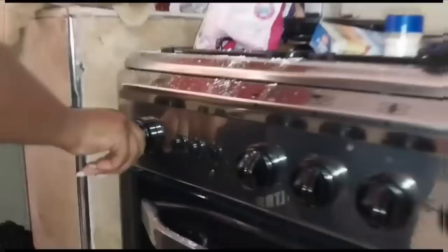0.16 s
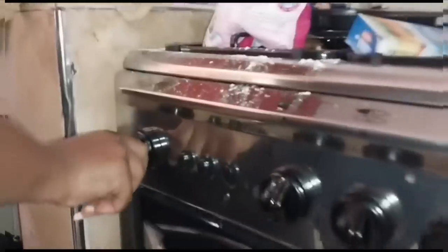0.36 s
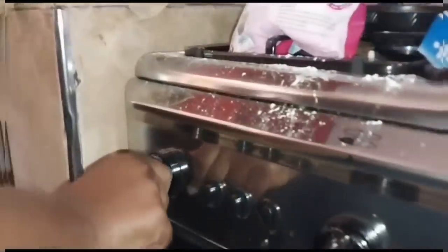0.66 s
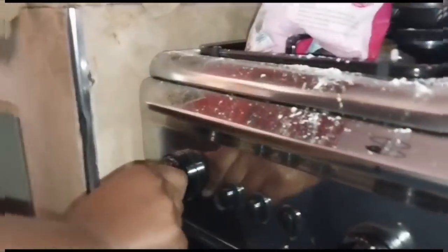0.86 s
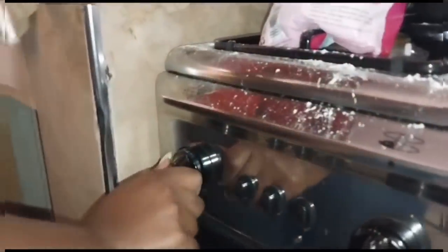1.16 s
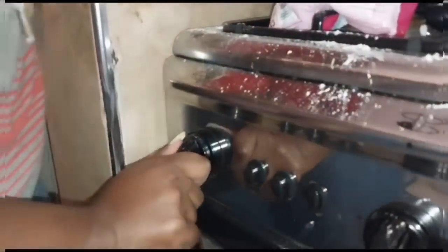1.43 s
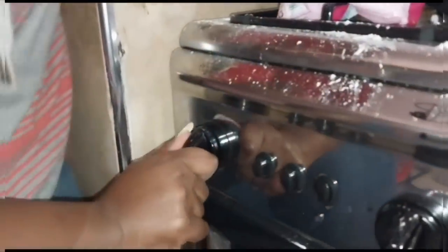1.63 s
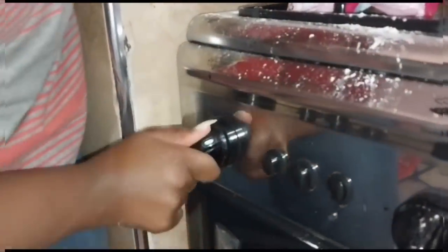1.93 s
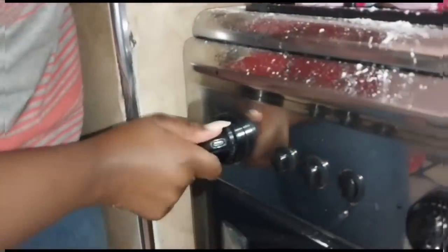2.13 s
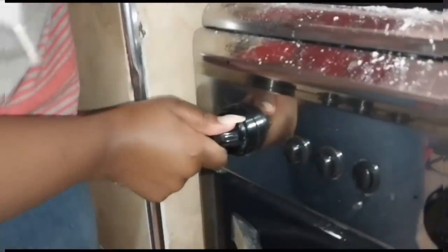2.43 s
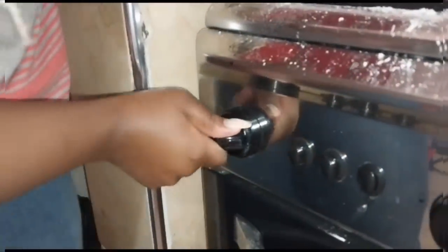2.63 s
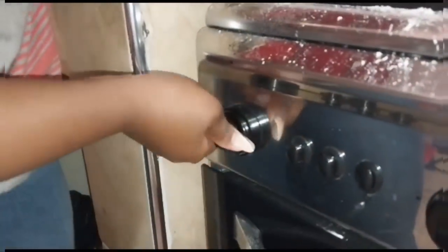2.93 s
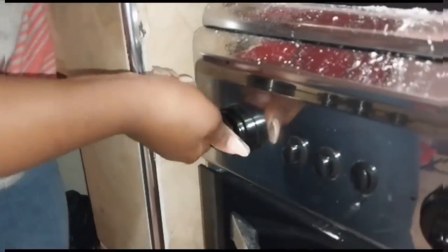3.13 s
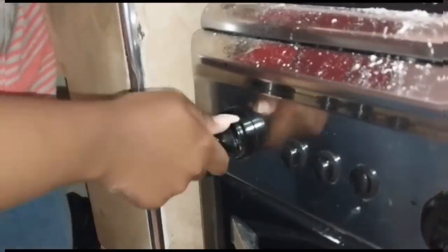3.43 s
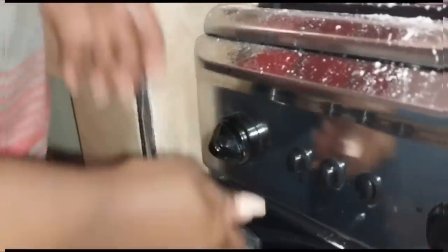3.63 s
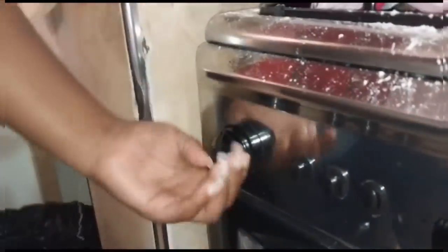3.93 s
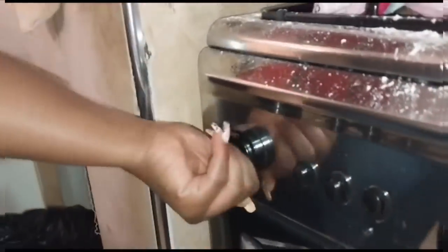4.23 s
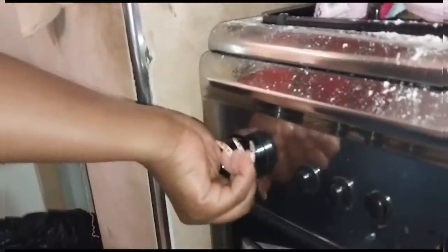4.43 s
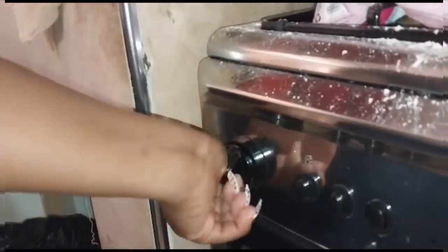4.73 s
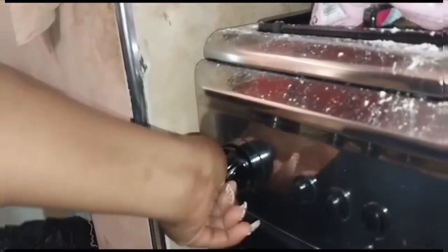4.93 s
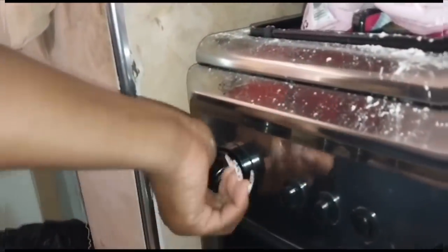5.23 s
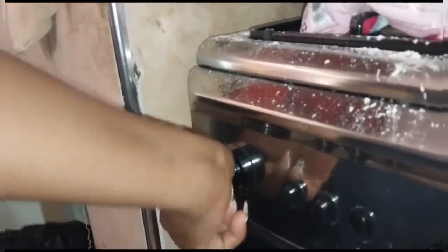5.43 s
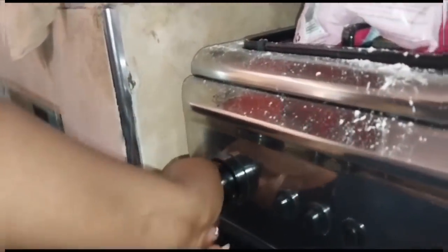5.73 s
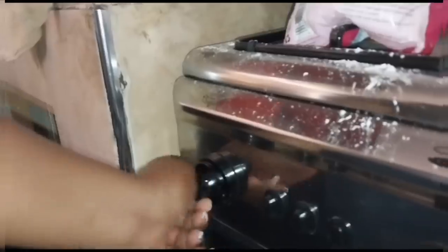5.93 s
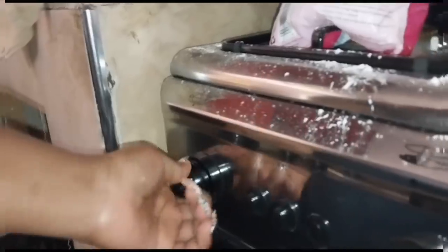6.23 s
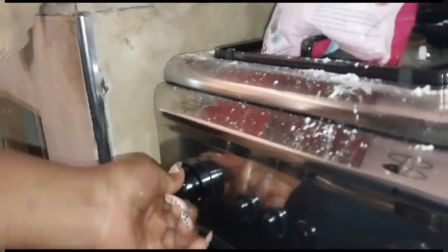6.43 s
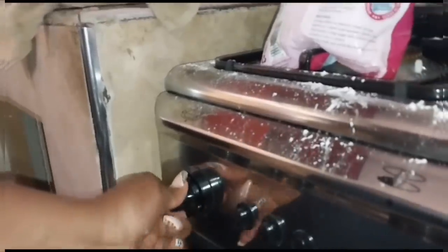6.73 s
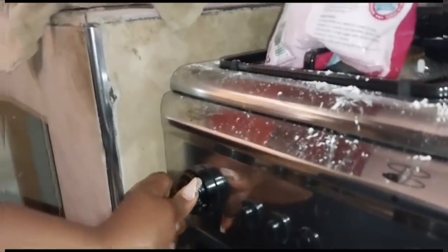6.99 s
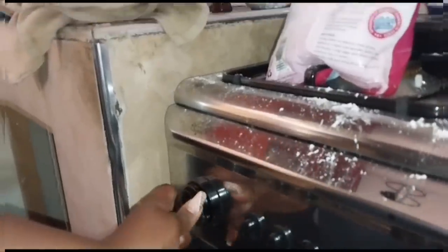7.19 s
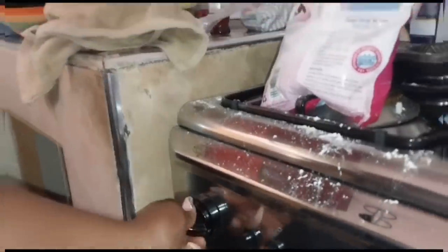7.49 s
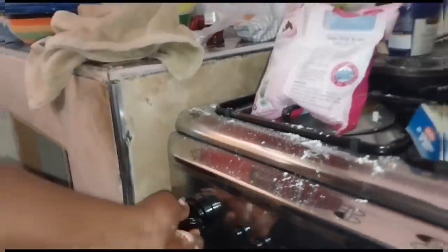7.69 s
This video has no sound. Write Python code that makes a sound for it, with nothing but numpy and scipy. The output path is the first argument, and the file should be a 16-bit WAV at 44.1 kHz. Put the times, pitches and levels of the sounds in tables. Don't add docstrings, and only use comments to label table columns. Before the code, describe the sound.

Close phone sound in a small kitchen with short, rattly reflections. At 0.13 s a crisp snap and a soft hollow thud, then gritty slipper and skin scuffs near 0.5 and 1.0 s. A faint spring whirr swells around 1.2 s among a few dry ticks at 1.1 to 1.6. At 1.77 to 1.78 s comes the loudest click pair, with a small, quickly choked metallic bell ting. Dense irregular ratchet clicks follow until about 3.6 s: thin bright ticks, snaps, plastic clacks, light steel-panel knocks. Sparser clicks and muffled oven thuds at 3.4 to 4.2, a light scuff at 4.4. Busy clusters run 4.6 to 5.0 and 5.4 to 5.75, a pause with few ticks, a bright snap at 6.46, then rapid uneven clicking from 6.7 to 7.8 s. Low oven boom and faint hush continue underneath.

```python
import sys
import numpy as np
from scipy import signal
from scipy.io import wavfile
from scipy.ndimage import uniform_filter1d

SR = 44100
rng = np.random.default_rng(int(sys.argv[2]) if len(sys.argv) > 2 else 0)


def wrap_up_sound(samples):
    columns = np.atleast_2d(samples).T
    tamed = np.clip(columns, -1, 1)
    steps = np.round(tamed * 32767).astype(np.int16)
    wavfile.write(sys.argv[1], SR, steps)


def to_linear_factor(level_db):
    exponent = np.asarray(level_db, float) / 20
    return 10 ** exponent


N = 346299

# (time [s], peak [dB], pawl ring [Hz], panel share [dB])
DULL_TICKS = [(0.3853, -35, 5160, -33), (1.1411, -18.5, 5240, -25.5), (1.363, -17.5, 5326, -31.5),
              (1.6146, -16.5, 5177, -24.5), (1.7705, -5.5, 5580, -21), (1.952, -16.5, 4943, -9.5),
              (3.325, -43, 5460, -19), (3.3418, -22.5, 5200, -16), (3.8484, -25.5, 5240, -29.5),
              (5.1915, -23.5, 5120, -14), (6.1605, -43, 5450, -45.5), (6.709, -42.5, 5030, -30.5),
              (6.7337, -21, 5200, -33.5), (6.9747, -18.5, 5400, -41.5), (7.3264, -22.5, 5440, -16.5),
              (7.5039, -23, 5330, -41.5), (7.767, -20, 5390, -31.5)]
BRIGHT_TICKS = [(2.0704, -19.5, 5515, -16.5), (2.3124, -22, 7330, -20.5), (2.58, -20.5, 6240, -44),
                (2.9464, -19.5, 4950, -11.5), (3.5907, -26.5, 5060, -48), (4.7995, -17, 4450, -8),
                (4.9085, -15, 5350, -14.5), (5.4616, -14, 5860, -16), (5.7108, -21, 5280, -11),
                (5.9502, -31, 4900, -22.5), (6.2063, -30, 5620, -29.5), (7.2482, -24.5, 5760, -22.5),
                (7.4854, -42.5, 5530, -52), (5.418, -52.5, 5300, -43), (7.126, -37, 5330, -40)]
DULL_SNAPS = [(0.8435, -31.5, 7500, -13), (0.8922, -28, 4780, -12), (1.7999, -16, 4500, -5.5),
              (4.3187, -31.5, 4800, -13), (4.402, -21.5, 5040, -12), (4.6615, -19.5, 5330, -7),
              (5.0239, -28.5, 4810, -17), (5.5655, -22, 4420, -12), (6.762, -24.5, 4900, -13)]
BRIGHT_SNAPS = [(0.1271, -15.5, 5044, -11), (1.9063, -22.5, 4800, -22.5), (2.0264, -27, 7350, -4.5),
                (2.2259, -22, 5270, -8), (2.992, -19.5, 5210, -20), (3.0832, -21.5, 5500, -21.5),
                (3.3591, -29.5, 4900, -12.5), (4.1219, -28, 4970, -11), (4.731, -25.5, 5230, -4.5),
                (5.216, -29, 5040, -9), (5.456, -23.5, 4830, -36), (5.5918, -27, 4640, -20),
                (5.969, -32, 4880, -8), (6.4617, -17, 5200, -14), (6.8722, -33, 4270, -19),
                (6.9005, -22, 5410, -14), (1.895, -32.5, 5200, -30.5), (7.0618, -20.5, 5807, -13),
                (7.3559, -27.5, 4870, -16.5), (7.7162, -31.5, 6260, -23), (4.028, -45.5, 4710, -32.5),
                (4.272, -44.5, 5200, -30), (4.795, -22, 4795, -29.5), (5.754, -34, 5200, -22),
                (6.979, -35, 5370, -18.5), (7.075, -47, 5300, -20.5), (7.103, -33.5, 5200, -24)]
DULL_CLACKS = [(0.4776, -33.5, 4774, 4.5), (1.7799, -11, 7060, -11), (2.14, -29.5, 5030, -1),
               (2.7063, -29, 4470, -4), (2.9019, -28.5, 4680, -3.5), (2.958, -29.5, 7360, -22.5),
               (3.4033, -31, 4830, -2.5), (3.4991, -46, 3570, 0.5), (3.537, -49.5, 3400, -0.5),
               (3.9842, -52, 4960, 15.5), (4.1966, -30.5, 5200, 2.5), (4.6343, -27.5, 5200, -0.5),
               (4.678, -25, 4310, -6), (4.817, -23, 5000, -23.5), (5.4462, -40, 4940, -5),
               (5.6013, -28.5, 4740, -10), (5.7203, -25, 5950, -15.5), (6.9585, -23.5, 5200, -7.5),
               (7.5769, -27.5, 4890, -13.5), (4.131, -51.5, 4500, -11), (5.427, -52.5, 4470, -3.5),
               (6.848, -29, 4780, -23.5)]
BRIGHT_CLACKS = [(1.8594, -24, 4460, -8), (2.348, -30.5, 6300, -8), (2.7922, -24, 5270, -5),
                 (2.815, -26.5, 4960, -21.5), (2.8534, -25.5, 4840, -7.5), (4.5697, -28, 5320, -2.5),
                 (4.9722, -27.5, 5110, -1.5), (5.6444, -25.5, 5050, -5), (6.8274, -31.5, 4260, -19.5),
                 (6.8404, -27.5, 6200, -7), (6.9318, -27, 4600, -8.5), (7.1693, -23.5, 4890, -11.5),
                 (7.0455, -34.5, 4700, -37.5)]
SLIP_S = [.166, .267, .759, .873, 2.503, 3.363, 3.527, 3.553, 3.828, 4.55, 5.184, 5.934, 6.401]
# (peak [dB], pawl ring [Hz], panel share [dB])
SLIP = [(-29.5, 5200, -40), (-39.5, 4970, -40.5), (-56.5, 4730, 8.5), (-38.5, 4700, -30.5), (-57, 4800, 3),
        (-36.5, 3600, -27), (-47.5, 2800, -24.5), (-42, 5000, -31), (-56.5, 5093, -53.5), (-47, 5000, 5),
        (-33.5, 5100, -20.5), (-41.5, 5450, -39), (-62.5, 5100, 1.5)]
PANEL_HZ = [780, 860, 990, 1070, 1250, 470, 620, 340]
# (level [dB], t60 [s])
PANEL = [(-11, 0.064), (-7, 0.0749), (1.5, 0.0566), (-5, 0.041), (-8.5, 0.04), (-10.5, 0.0504),
         (-11.5, 0.0428), (-8.5, 0.0675)]


def ratchet():
    slips = [(s, *row) for s, row in zip(SLIP_S, SLIP)]
    # (clicks, treble share dB, knob share dB, knob dB lost per dB of pawl)
    kinds = [(DULL_TICKS, -17.5, -44.5, 0.009), (BRIGHT_TICKS, -2.2, -31.5, 0.01),
             (DULL_SNAPS, -13, -6.5, 0.01), (BRIGHT_SNAPS, -5, -4.5, 0.0104),
             (DULL_CLACKS, -23.5, 0.1, 0.27), (BRIGHT_CLACKS, -0.64, -0.084, 0.23),
             (slips, -18, -27.5, 0.01)]
    usual_db = -25
    detune = 0.02513
    near, far, knock = np.zeros((3, N))
    t = np.arange(SR // 5) / SR
    short = t[:1024]
    impulse = 1. * (short == 0)
    for rows, treble_db, base_knob_db, slope in kinds:
        for s, db, hz, panel_db in rows:
            knob_db = base_knob_db - slope * (db - usual_db)
            hiss, spread = rng.standard_normal(1024), rng.random(3)
            length_s = 0.000466 + 0.00063 * spread[0] ** 2
            chatter = hiss * short / length_s * np.exp(-short / length_s)
            ring_hz = hz, 5500 + 1800 * spread[1]
            high_hz = 9500 + 4500 * spread[2]
            shares_db = db + 2.0, db + treble_db - 5.5, db + knob_db - 1.0
            rattle_db = 0.1677 * np.clip(knob_db + 22.5, -20, 10)
            add(near, s, to_linear_factor(-1.0457) * clack(chatter, ring_hz, high_hz, shares_db, blur=0.7))
            add(far, s, to_linear_factor(rattle_db) * clack(impulse, ring_hz, high_hz, shares_db, blur=4.6))
            modes_hz = PANEL_HZ * (1 + detune * rng.standard_normal(len(PANEL)))
            swing = rings(modes_hz, PANEL, t, uneven_db=2.0)
            swing = swing * (1 - np.exp(-t / 0.0017))
            add(knock, s, to_linear_factor(db + panel_db - 2.5) * swing / abs(swing).max())
    small = signal.butter(2, 1300, "high", fs=SR, output="sos")
    near = signal.sosfilt(small, near) + knock
    far = signal.sosfilt(small, far) + to_linear_factor(-5.5) * knock
    return near, far


def clack(drive, ring_hz, high_hz, shares_db, blur):
    pawl_hz, body_hz = ring_hz
    pawl = 1.058 * resonate(resonate(drive, pawl_hz, 650 * blur), pawl_hz, 1400)
    pawl = pawl + 0.188 * resonate(resonate(drive, body_hz, 4600), body_hz, 4600)
    pawl = pawl + 0.537 * resonate(drive, 6300 + 0.1347 * (high_hz - 6000), 450 * blur)
    treble = resonate(drive, high_hz, 1500 * blur)
    treble = treble + resonate(resonate(drive, 12510, 6000), 10100, 8000)
    knob = resonate(drive, 2200 + 0.1 * body_hz, 500 * blur) + resonate(drive, 2000, 1300)
    return sum(to_linear_factor(db) * part / abs(part).max() for part, db in zip((pawl, treble, knob), shares_db))


# (time [s], peak [dB], ring [Hz])
WHEELS = [(0.1276, -25.5, 9700), (1.1406, -20, 11850), (1.3623, -29, 8930), (1.6144, -18, 11900),
          (1.77, -28, 11800), (1.782, -21, 11700), (1.905, -19, 12600), (1.952, -21, 12400),
          (2.026, -22.5, 12150), (2.07, -20, 11300), (2.1375, -25, 12400), (2.2264, -26, 9230),
          (2.3116, -19.5, 12200), (2.3482, -19.5, 11690), (2.5798, -17.5, 13600), (2.707, -30.5, 12100),
          (2.7926, -40, 12300), (2.815, -17.5, 9500), (2.8529, -24, 12150), (2.9474, -31, 12600),
          (2.9932, -18.5, 12900), (3.0834, -18.5, 11780), (3.3404, -31, 12400), (3.5925, -28.5, 11800),
          (3.849, -33, 11730), (4.121, -28.5, 11500), (4.1964, -36, 12500), (4.318, -35, 10100),
          (4.4017, -29, 12100), (4.5705, -26.5, 11840), (4.635, -32, 11900), (4.6598, -22, 13500),
          (4.7315, -25.5, 12000), (4.7975, -20, 12500), (4.9075, -22, 13900), (4.9724, -26, 12040),
          (5.457, -16, 9700), (5.462, -11, 12420), (5.5653, -41.5, 11900), (5.645, -26.5, 12150),
          (5.712, -19.5, 9840), (6.2066, -26.5, 9550), (6.4626, -12.5, 10000), (6.7332, -21.5, 9700),
          (6.8283, -22, 11340), (6.9012, -22.5, 13300), (6.9311, -26, 14900), (6.976, -21.5, 11370),
          (7.045, -25, 12850), (7.1694, -27, 10100), (7.2483, -21.5, 9170), (7.3258, -26.5, 9240),
          (7.3557, -28, 10000), (7.4865, -41.5, 9180), (7.5044, -30, 12450), (7.5762, -32, 11310),
          (7.7165, -22.5, 14700), (7.7664, -23, 12100),
          (6.8408, -19.5, 11900), (6.9585, -25.5, 10500), (7.0622, -25, 9300)]
# (time [s], peak [dB], ring [Hz])
KNOB = [(0.1266, -20.5, 3696), (0.9933, -33.5, 3380), (1.008, -26.5, 3210), (1.0114, -19, 3240),
        (1.7704, -35, 3840), (1.7812, -13.5, 2773), (1.888, -26.5, 2600), (2.14, -26, 2998),
        (2.2256, -34.5, 3522), (2.3464, -32, 2215), (2.7067, -31.5, 2770), (2.7932, -36, 2330),
        (2.8526, -29.5, 2910), (2.901, -30.5, 3150), (2.9473, -26, 3000), (2.9924, -32, 2980),
        (3.083, -55, 3040), (3.339, -40.5, 3600), (3.4014, -37, 3040), (3.4994, -34, 3510),
        (4.132, -40, 3300), (4.1958, -35, 3130), (4.3172, -38, 3440), (4.4026, -30, 3020),
        (4.57, -33.5, 3040), (4.6342, -30.5, 3830), (4.674, -34.5, 3750), (4.7974, -21.5, 3330),
        (4.9059, -27, 3230), (4.9719, -34.5, 3115), (5.1896, -43, 3900), (5.2163, -36.5, 3000),
        (5.457, -32, 3730), (5.4604, -27, 3010), (5.565, -49, 3800), (5.6439, -28.5, 3590),
        (5.7193, -47.5, 2980), (5.72, -29.5, 3160), (6.4612, -32.5, 3070), (6.7327, -51.5, 3734),
        (6.761, -33.5, 3190), (6.8274, -27.5, 3060), (6.8473, -23, 2990), (6.9016, -34.5, 3200),
        (6.9334, -28, 3140), (6.9568, -29.5, 3100), (7.0469, -28.5, 2990), (7.1702, -30, 2890),
        (7.3257, -43.5, 3810), (7.3579, -37.5, 2880), (7.5764, -32.5, 3090), (7.7154, -46, 3080)]


def parts():
    lead_s = 0.0005
    near, far = np.zeros((2, N))
    t = np.arange(1024) / SR
    impulse = 1. * (t == 0)
    # (clicks, ring width Hz, near dB, room dB)
    kinds = [(WHEELS, 1800, -5, -7), (KNOB, 568, -0.89, -3.2)]
    for rows, width_hz, near_db, far_db in kinds:
        for s, db, hz in rows:
            chatter = rng.standard_normal(1024) * t * np.exp(-t / 0.00072)
            for mix, drive, share_db in ((near, chatter, near_db), (far, impulse, far_db)):
                ring = resonate(resonate(drive, hz, width_hz), hz, 3.2 * width_hz)
                add(mix, s - lead_s, to_linear_factor(db + share_db) * ring / abs(ring).max())
    return np.array([near, far])


# (time [s], level [dB])
STRIKE = (1.783, -22)
BELL_HZ = [1247, 1275, 2589, 2583, 2651, 4293, 6352, 8807, 11693, 14996]
# (level [dB], t60 [s])
BELL = [(-4, 0.16), (-4, 0.16), (-1, 0.655), (-21.5, 0.3), (-7, 0.3), (-11, 1.05), (-17, 0.3), (-20, 0.28),
        (-6.5, 0.3), (-17, 0.2)]


def bell():
    choke_s, choke_width_s, choke_depth, choked_db_per_s = 0.096, 0.005, 0.85, -45
    out, t = np.zeros(N), np.arange(SR) / SR
    choke = 1 - choke_depth * np.exp(-((t - choke_s) / choke_width_s) ** 2)
    choke = choke * to_linear_factor(choked_db_per_s * np.clip(t - choke_s, 0, 0.15))
    swell = 1 - np.exp(-t / 0.0075)
    s, db = STRIKE
    add(out, s, to_linear_factor(db) * rings(BELL_HZ, BELL, t) * swell * choke)
    return out


# (level [dB], swell [s], fade [s])
DRAG = (-45.5, 0.065, 0.367)
# (frequency [Hz], width [Hz], level [dB])
DRAG_RINGS = [(616, 110, -17.5), (4540, 560, -10.5), (5050, 390, -1), (7500, 800, -0.5)]


def drag():
    peak_s = 1.17
    hiss = rng.standard_normal(N)
    ring = 0
    for hz, width_hz, db in DRAG_RINGS:
        ring = ring + to_linear_factor(db) * evened(resonate(resonate(hiss, hz, width_hz), hz, 2 * width_hz))
    return evened(ring) * spread_out(strokes(peak_s, *DRAG, 1.76, 1.1)[:, 0])


# (time [s], level [dB], frequency [Hz], t60 [s], pitch sag [share])
THUDS = [(0.132, -34, 91.27, 1, 0.0724), (.14, -30, 209.9, 0.455, 0.0533),
         (3.01, -42, 152.1, 0.746, 0.0182), (3.398, -33, 211.6, 0.388, 0.089),
         (3.402, -44.5, 506.7, 0.434, 0.116), (3.98, -33.5, 193.6, 0.92, 0.022),
         (3.98, -38, 103.9, 0.55, 0.049), (4.179, -30.5, 111, 0.283, 0.096),
         (4.195, -34.5, 241, 0.33, 0.0924), (4.197, -35.5, 560, 0.388, .15),
         (1.78, -35.5, 187.5, 0.836, 0.057), (1.789, -38, 100.6, 0.62, 0.06)]


def thuds():
    rise_s, wobble_db = 0.0117, 3
    out, t = np.zeros(N), np.arange(SR // 2) / SR
    for s, db, hz, t60, sag in THUDS:
        turns = np.cumsum(hz * (1 - sag * (1 - np.exp(-t / 0.08)))) / SR
        wobble = uniform_filter1d(rng.standard_normal(len(t)), size=500)
        wobble = evened(uniform_filter1d(wobble, size=500))
        level = to_linear_factor(db - 60 * t / t60 + wobble_db * wobble) * (1 - np.exp(-t / rise_s))
        add(out, s, level * np.sin(2 * np.pi * turns))
    return out


# (time [s], boom [dB], fade to -20 dB [s], floor share [dB], door share [dB])
JOLTS = [(0.157, -31, 0.268, -5, -3.5), (0.501, -42.5, 0.09, -15.5, -2.5), (1.794, -36, 0.46, -4, -6.5),
         (3.417, -40.5, 0.128, -15, 0.5), (4.003, -46, 1.4, -1, -8), (4.203, -40, 0.3929, -11, 0.5),
         (6.2, -51, 0.15, -23, -24), (6.42, -46.5, 0.41, -12, -11)]
# (peak time [s], boom [dB], swell from -20 dB [s], fade to -20 dB [s], door share [dB])
LEANS = [(.05, -65, 14, -1.14, 4), (.85, -51.5, -0.62, 0.12, -4.5), (1.4, -63.5, -1.66, 6.25, -15),
         (1.25, -68.5, 1.24, 1.43, 7.5), (2.2, -45.5, 0.35, .5, -20.5), (2.56, -57, 0.5, -1.5, -5.5),
         (3.75, -72, 2.8, -1.5, -16), (2.85, -41.5, 0.0252, 0.3548, -4), (4.68, -41, -0.0559, 0.6, -1.5),
         (4.98, -38.5, 0.1836, 0.0949, -16), (5.24, -48.5, -0.02, 0.01, -5), (5.721, -43, 0.38, 0.14, -7),
         (6.001, -52, 0.18, 0.1763, -5), (6.82, -50.5, 0.12, 0.61, -20), (7.15, -48, 0.3941, -0.06, -17.5),
         (7.4, -57.5, 0.96, 0.16, 1.5), (7.63, -54.5, 0.12, 0.5, 1.5)]
# (frequency [Hz], width [Hz], level [dB])
OVEN = [(155.7, 8.98, -4), (195.58, 18.58, 2.5), (238.6, 22.95, 0), (274.7, 59, -3)]
# (frequency [Hz], width [Hz], level [dB])
FLOOR = [(60, 80, -2), (97.8, 40, -6)]
# (frequency [Hz], width [Hz], level [dB])
DOOR = [(424.4, 22, -2), (491.8, 71.5, 0.76), (576.2, 150, -2)]


def oven():
    s, db, fade_s, floor_db, door_db = np.transpose(JOLTS)
    jolts = strokes(s, db, 0.0319, fade_s, 2.5, 1.205)
    *lean, lean_door_db = np.transpose(LEANS)
    leans = strokes(*lean, 1.242, 1.242)
    flat = 0 * lean_door_db
    rest_db = -67
    push = rng.standard_normal((2, N))
    push[0] = 0.517 * push[1] + 0.3 * push[0]
    # (modes, jolt share dB, lean share dB, rest share dB)
    walls = ((OVEN, 0 * s, flat, 0),
             (FLOOR, floor_db, flat - 14.5, 2.5),
             (DOOR, door_db - 5.0, lean_door_db - 6.5, -22.0))
    out = 0
    for modes, jolt_db, lean_db, rest_share_db in walls:
        ring = 0
        for hz, width_hz, mode_db in modes:
            mode = resonate(resonate(push, hz, 1.595 * width_hz), hz, 1.577 * width_hz)
            ring = ring + to_linear_factor(mode_db) * evened(mode)
        power = jolts @ to_linear_factor(2 * jolt_db) + leans @ to_linear_factor(2 * lean_db) + to_linear_factor(2 * (rest_db + rest_share_db))
        out = out + evened(ring) * spread_out(power)
    return out * to_linear_factor([[-0.8], [0.8]])


# (peak time [s], level [dB], swell from -20 dB [s], fade to -20 dB [s], brightness [dB/octave])
SCUFFS = [(.045, -49, 0.77, 0.1, -5), (.33, -53.5, 0.08, 0.5, -1), (0.198, -36, 0.0746, 0.03, -9.5),
          (.462, -59, 0.08, 0.0948, 2), (0.492, -28.5, 0.0484, 0.0115, -9),
          (0.556, -28, 0.1174, 0.0363, -3.5), (0.8, -35.5, -0.08, 0.0745, -10),
          (.86, -41.5, 0.177, 0.05, -3.5), (1.007, -25.5, -0.0016, 0.0383, -4),
          (1.053, -24.5, 0.0675, 0.0812, -4), (1.2, -44, 0.1441, 0.41, -3.5),
          (1.569, -45, 0.16, 0.2345, -3.5), (2.517, -46.5, -0.0252, 0.3624, -4.5),
          (2.608, -42.5, 0.0837, 0.1375, -5), (3.52, -55, 0.25, 0.7, -8),
          (3.683, -42, 0.1364, 0.1261, -5.5), (3.139, -52.5, -0.04, -0.0137, -8),
          (4.426, -36.5, 0.14, 0.1156, -4), (5.202, -59.5, 2.19, 0.23, -7.5),
          (0.991, -43, -0.09, 0.0421, -6), (1.51, -49, -0.11, -0.2, -11)]
# (frequency [Hz], density [dB/Hz])
RUB = [(300, -32.5), (900, -17), (1600, -5.5), (3000, 2), (4400, 3), (5200, 5.5), (8000, 6.5), (16000, -7)]


def scuffs():
    skin_hz, skin_width_hz, skin_db_per_tilt = 2870, 560, -0.1569
    *shape, tilts_db = np.transpose(SCUFFS)
    power = strokes(*shape, 1.47, 1.61)
    total = power.sum(1)
    s, tilt_db = np.arange(len(power)) / 1000, power @ tilts_db / total
    hz = np.fft.rfftfreq(512, 1 / SR)
    unit_db = -10 * np.log10(np.sum(to_linear_factor(2 * read(RUB, hz))))

    def level_db(f, t):
        octaves = np.log2(np.clip(f, 2300, 9000) / 4000)
        skin = skin_db_per_tilt / (1 + (2 * (f - skin_hz) / skin_width_hz) ** 2)
        return read(RUB, f) + np.interp(t, s, tilt_db) * (octaves + skin)

    rub = noise(level_db, channels=1)[0]
    grit = to_linear_factor(3.4 * uniform_filter1d(rng.exponential(1, N), size=12))
    return evened(grit) * rub * to_linear_factor(unit_db - 6.0) * spread_out(total)


# (frequency [Hz], t60 [s])
KITCHEN = [(150, 0.057), (1000, 0.3954), (3000, 0.2765), (7000, 0.1717), (14000, 0.1755)]


def kitchen(x):
    out, t = np.zeros((2, N)), np.arange(N) / SR
    for k in range(3):
        taps = np.zeros((2, SR // 2))
        at = np.arange(90, SR // 2 - 20, 10) + rng.integers(0, 10, (2, (SR // 2 - 101) // 10))
        np.put_along_axis(taps, at, rng.choice([-1., 1.], at.shape), 1)
        hz, u, z = signal.stft(taps, SR, nperseg=128)
        same = likeness(hz)
        z[0] = same * z[1] + np.sqrt(1 - same ** 2) * z[0]
        room = to_linear_factor(-60 * u / read(KITCHEN, hz)[:, None])
        rattle = to_linear_factor(9.5 - 60 * u / 0.0154)
        tail = signal.istft(z * (room + rattle), SR, nperseg=128)[1]
        turn = np.sqrt(2 / 3) * np.cos(np.pi * (7 * t + k / 3))
        out += signal.fftconvolve((x * turn)[None], tail / np.linalg.norm(tail[1]), axes=1)[:, :N]
    return out


# (frequency [Hz], density [dB/Hz])
HUSH = [(18, -50), (34, -17), (97, -11.5), (169, -14.5), (231, -30), (400, -39.5), (1400, -50.5),
        (3000, -36), (5340, -34), (8330, -34.5), (12700, -40.5), (15600, -37)]


def hush():
    return to_linear_factor(-62.5) * evened(noise(lambda f, t: read(HUSH, f) + 0 * t))


# (frequency [Hz], likeness [0..1])
SAME = [(100, 0.44), (300, 0.66), (700, 0.53), (1500, 0.089), (16000, 0.049)]


def likeness(hz):
    return np.clip(read(SAME, hz), 0, 1)[:, None]


def noise(level_db, channels=2):
    frames, hz = N // 128 + 5, np.fft.rfftfreq(512, 1 / SR)
    a, b, c, d = rng.standard_normal((frames, 257, 4)).T
    same, left = likeness(hz), a + 1j * b
    right = same * left + np.sqrt(1 - same ** 2) * (c + 1j * d)
    z = np.array([left, right])[:channels]
    z = z * to_linear_factor(level_db(hz[:, None], np.arange(frames) * 128 / SR))
    return signal.istft(z, nperseg=512, noverlap=384)[1][:, :N]


def strokes(s, db, swell_s, fade_s, bend, tail_bend):
    late = np.arange(0, N / SR + 0.002, 0.001)[:, None] - s
    drop = np.where(late < 0, abs(late / swell_s) ** bend, abs(late / fade_s) ** tail_bend)
    return to_linear_factor(2 * np.maximum(db - 20 * drop, -120))


def spread_out(power):
    return np.interp(np.arange(N) / SR * 1000, np.arange(len(power)), np.sqrt(power))


def rings(modes_hz, modes, t, uneven_db=0):
    db, t60 = np.transpose(modes)[:, :, None]
    db = db + uneven_db * rng.standard_normal(db.shape)
    return (to_linear_factor(db - 60 * t / t60) * np.sin(2 * np.pi * np.outer(modes_hz, t))).sum(0)


def resonate(x, hz, width_hz):
    pole = np.exp((2j * np.pi * hz - np.pi * width_hz) / SR)
    return 2 * signal.lfilter([1 - abs(pole)], [1, -pole], x).real


def evened(x):
    return x / np.sqrt(np.mean(x ** 2) + 1e-20)


def read(points, hz):
    f, value = np.transpose(points)
    return np.interp(np.log(hz + 1), np.log(f + 1), value)


def add(mix, s, sound):
    part = mix[round(s * SR):][:len(sound)]
    part += sound[:len(part)]


def causal(db):
    log = np.log(to_linear_factor(np.concatenate([db, db[-2:0:-1]])))
    return np.fft.ifft(np.exp(np.conj(signal.hilbert(log)))).real[:1024]


def scene():
    lag = 5
    near, far = ratchet() + parts()
    ring, rub = bell(), scuffs() + drag()
    left = to_linear_factor(-5.5) * np.roll(near, lag) + to_linear_factor(2.5) * ring + to_linear_factor(-4.5) * np.roll(rub, -lag)
    direct = np.array([left, near + ring + rub])
    room = kitchen(to_linear_factor(4.5) * far + to_linear_factor(-18.0) * ring + to_linear_factor(5.5) * rub)
    return direct + room + oven() + hush() + thuds()


def roll_off(x):
    return signal.sosfilt(signal.butter(12, 16560, fs=SR, output="sos"), x)


# (frequency [Hz], width [Hz], level [dB])
PORT = [(3040, 250, 1), (5200, 520, 4.5), (6806, 490, 1.5), (8145, 1027, -7.5), (12670, 4120, 8)]
# (frequency [Hz], level [dB])
SHADE = [(60, -2.5), (130, -0.5), (290, 1), (640, -3), (1410, -5.5), (3100, -11.5), (6820, -12),
         (15000, -10.5)]
# low edge [Hz], high edge [Hz]
EDGES_HZ = [45, 15750]


def record(dry):
    hz = np.fft.rfftfreq(4096, 1 / SR)
    port_db = sum(db / (1 + (2 * (hz - f) / width_hz) ** 2) for f, width_hz, db in PORT)
    shade_db = read(SHADE, hz) / 2 + 1.326
    taps = np.array([causal(port_db + shade_db), causal(port_db - shade_db)])
    heard = signal.oaconvolve(dry, taps, axes=1)[:, :N]
    heard = signal.sosfilt(signal.butter(2, EDGES_HZ[0], "high", fs=SR, output="sos"), heard)
    heard = signal.sosfilt(signal.cheby1(10, 0.5, EDGES_HZ[1], fs=SR, output="sos"), heard)
    return roll_off(np.clip(heard, -1, 1))


dry = scene()
out = record(dry)
wrap_up_sound(out)
```